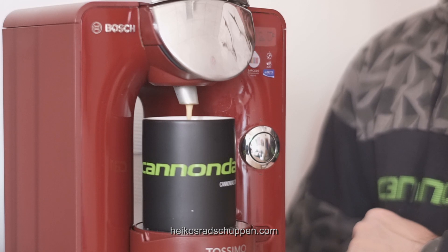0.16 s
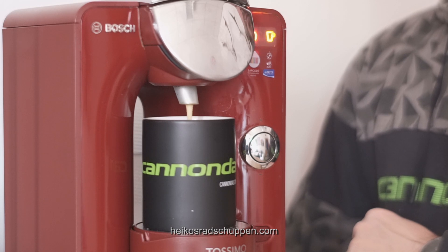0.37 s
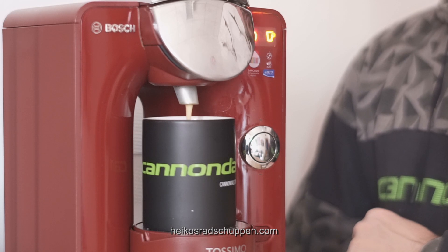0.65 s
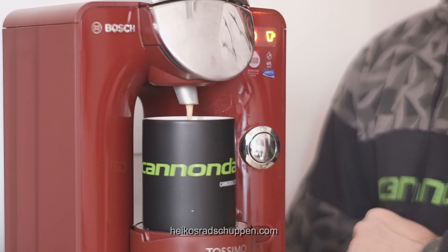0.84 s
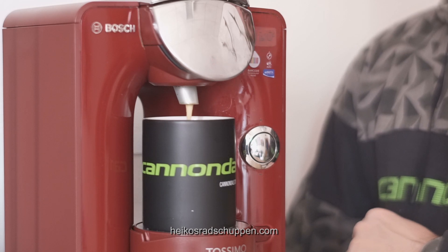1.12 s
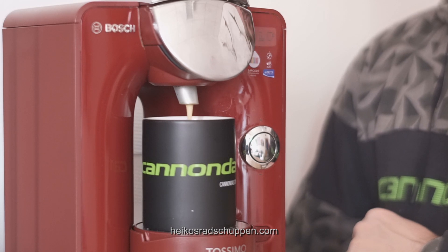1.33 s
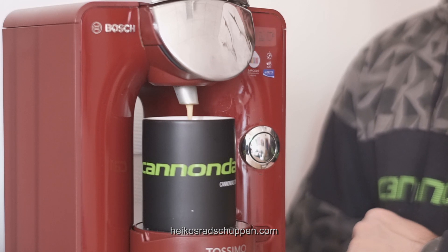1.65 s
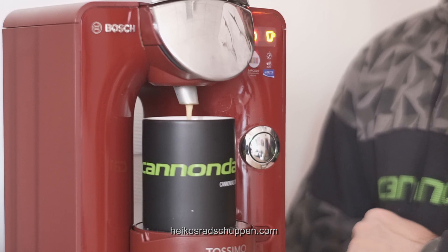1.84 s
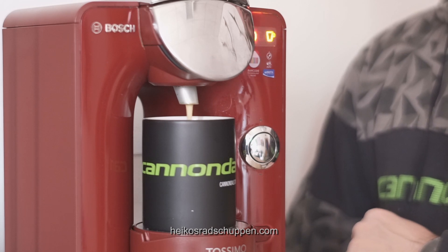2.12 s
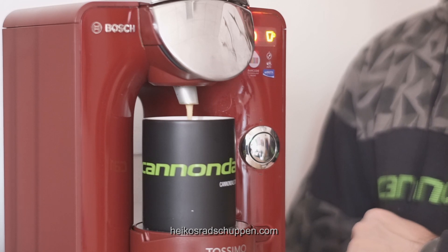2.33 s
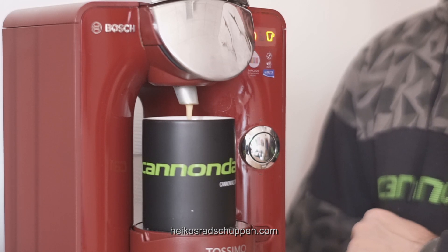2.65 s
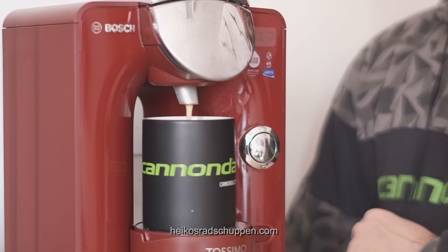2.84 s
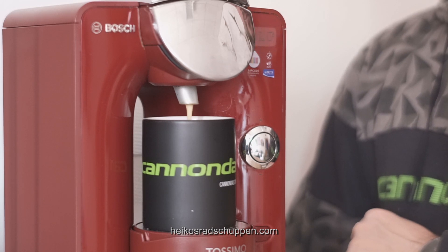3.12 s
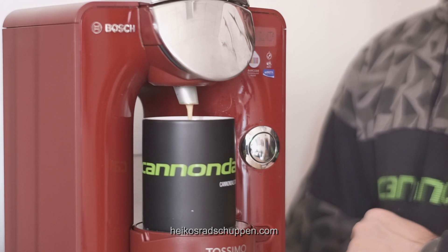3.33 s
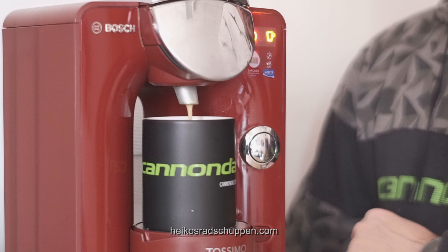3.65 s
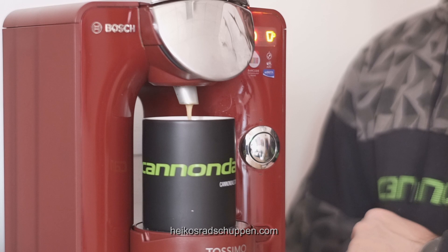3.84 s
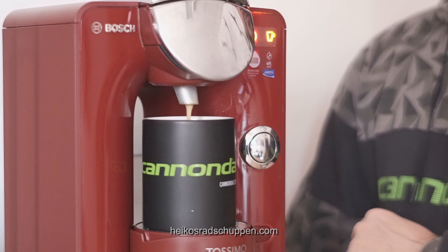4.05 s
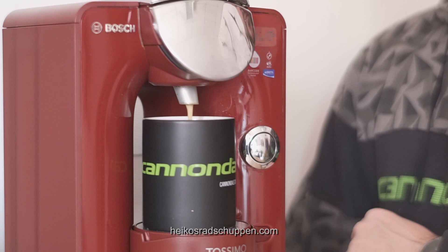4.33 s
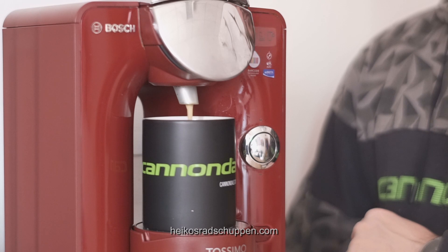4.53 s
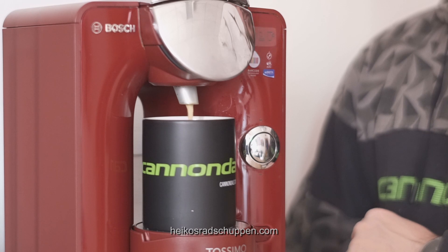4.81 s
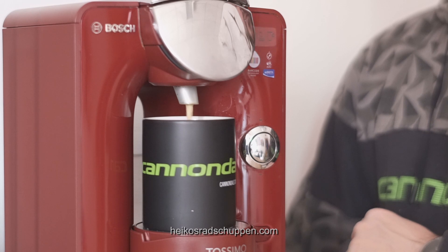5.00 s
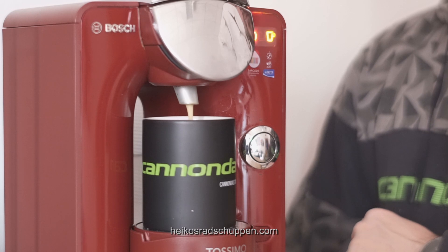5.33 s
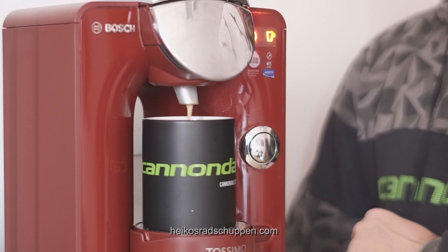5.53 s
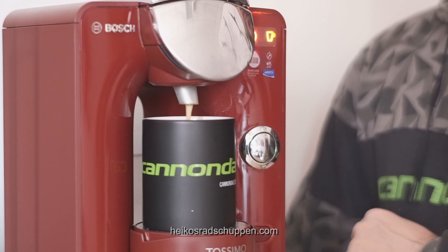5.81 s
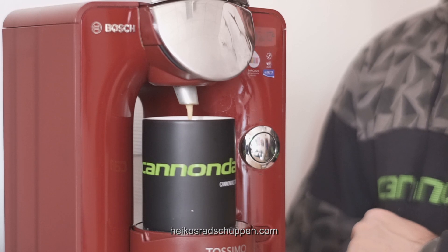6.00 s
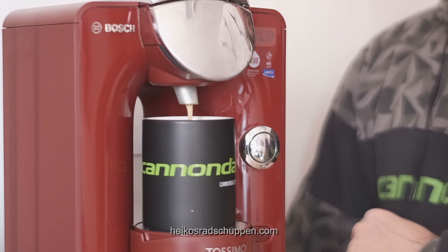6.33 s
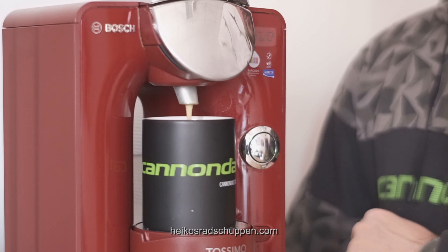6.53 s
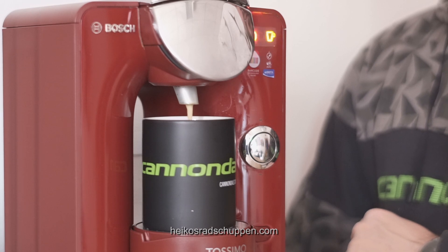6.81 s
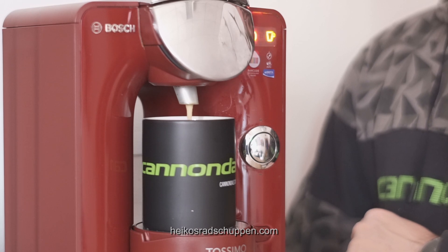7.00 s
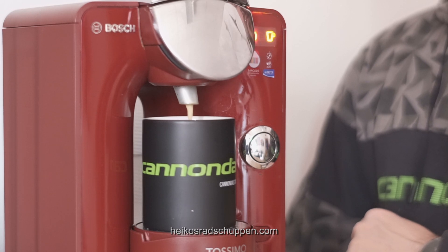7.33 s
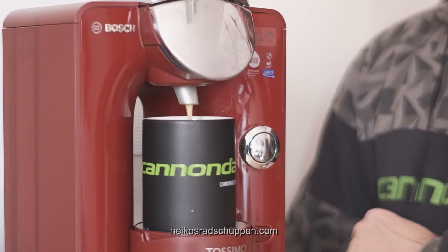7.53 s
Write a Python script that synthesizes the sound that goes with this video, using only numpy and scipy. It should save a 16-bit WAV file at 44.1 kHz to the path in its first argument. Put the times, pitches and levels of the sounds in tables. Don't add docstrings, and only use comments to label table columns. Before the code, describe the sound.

Close coffee maker: low electric pump hum and water rush cut off, wet glugging follows, then harsh bursts of hissing, spluttering steam.

```python
import sys
import numpy as np
from scipy import signal
from scipy.fft import rfft, irfft
from scipy.io import wavfile
from scipy.ndimage import uniform_filter1d

SR = 44100
rng = np.random.default_rng(int(sys.argv[2]) if len(sys.argv) > 2 else 0)


def pcm_store(signal):
    levels = np.round(np.clip(np.atleast_2d(signal), -1, 1) * 32767)
    wavfile.write(sys.argv[1], SR, levels.astype(np.int16).T)


def volts_from_decibels(level):
    exponent = np.asarray(level, float) / 20
    return 10 ** exponent


N = 337806
TIME = np.arange(N) / SR
HZ = np.fft.rfftfreq(N, 1 / SR)


def shape(points):
    hz, db = np.transpose(points)
    return volts_from_decibels(np.interp(np.log(HZ + 1), np.log(hz), db))


def level(x, db):
    return x * volts_from_decibels(db) / np.sqrt(np.mean(x ** 2))


# f/Hz, side minus mid level/dB
STEREO_WIDTH = [(30, -31), (60, -21), (200, -21), (400, -14.5), (800, -13), (1500, -11), (3000, -8),
                (6000, -6.5), (15000, -5.5)]


def noise(gain, wider_db=0):
    mid, side = rfft(rng.standard_normal((2, N))) * gain
    side = side * np.minimum(shape(STEREO_WIDTH) * volts_from_decibels(wider_db), 1)
    return level(irfft([mid + side, mid - side], N), 0)


def walk(rate):
    hold = int(SR / rate)
    steps = np.repeat(rng.standard_normal(N // hold + 1), hold)
    return 0.98 * uniform_filter1d(uniform_filter1d(steps, hold), hold)[:N]


def ring(x, modes, patchy_db=0):
    lumps_per_s = 35
    out = 0
    for k, (hz, width, db) in enumerate(modes):
        drive = x
        if patchy_db:
            drive = x * volts_from_decibels(patchy_db * walk(lumps_per_s) - .1 * patchy_db ** 2)
        out = out + (-1) ** k * volts_from_decibels(db) * signal.lfilter(*signal.iirpeak(hz, hz / width, SR), drive)
    return out


def bursts(times, db, t60, rise_s):
    out = np.zeros(N)
    for start, gain, fall in zip(times, volts_from_decibels(db), np.clip(t60, .005, .5)):
        part = slice(int(start * SR), int((start + fall) * SR))
        t = TIME[part] - start
        out[part] += gain * np.clip(t / rise_s, 0, 1) * volts_from_decibels(-60 * t / fall)
    return out


def spell(start, length, db, end_db, attack_s, release_s):
    t = TIME - start
    drift_db = db + (end_db - db) * np.clip(t / length, 0, 1)
    opening = np.minimum(t / attack_s, 1 + (length - t) / release_s)
    return volts_from_decibels(drift_db) * np.clip(opening, 0, 1)


# f/Hz, level/dB
ROOM_TONE = [(20, -39), (50, 1.5), (75, -7), (110, -5), (180, -9), (360, -13.5), (450, -13), (1000, -15),
             (2100, -17.5), (4700, -21.5), (7000, -26.5), (11000, -24.5), (15800, -26)]


def air():
    whistle = ring(noise(1), [(5750, 140, 0), (6290, 200, -8)])
    leak = level(whistle, -49.5) * volts_from_decibels(2.2 * walk(14))
    return level(noise(shape(ROOM_TONE), 4.0), -40.5) + leak


def room(x, wet_db, t60):
    t = TIME[:int(.5 * SR)]
    tail = noise(1)[:, :len(t)] * volts_from_decibels(-60 * t / t60) * (t > .004)
    tail = signal.lfilter([.5], [1, -.5], tail)
    tail = tail * volts_from_decibels(wet_db) / np.sqrt(np.sum(tail ** 2) / 2)
    return x + signal.fftconvolve(x, tail, axes=1)[:, :N]


# f/Hz, level/dB, t60/s
HOUSING = [(192, 3.5, 0.09), (244.4, 0.5, 0.22), (398, 3, 0.094), (534, 9.5, 0.046), (713, -1.5, 0.076),
           (1090, -2.5, 0.039), (1490, -5, 0.085), (2134, -9, 0.037)]


def knock():
    knock_s, knock_db = 7.082, -22
    blows = [(0, 4, -2), (.005, 4.5, -8), (.014, 0, 5), (.034, -3.5, -1), (.052, -8, 5)]  # s, dB, dB below 300 Hz
    out = np.zeros(N)
    t = TIME[:SR // 2]
    for delay, blow_db, low_db in blows:
        start = int((knock_s + delay) * SR)
        spots = rng.standard_normal((len(HOUSING), 2))
        for (hz, mode_db, t60), spot in zip(HOUSING, spots):
            swing = 1 - np.exp(-t * hz ** 2 / 200)
            db = knock_db + blow_db + mode_db + low_db * (hz < 300) + 2.1 * spot[0]
            tone = np.sin(2 * np.pi * hz * (1 + 0.028 * spot[1]) * t)
            out[start:start + len(t)] += volts_from_decibels(db - 60 * t / t60) * swing * tone
    crack = noise(HZ > 6000) * bursts([knock_s], np.array([-21]), [.05], 0.00071)
    return out + crack


# t/s, length/s, level/dB, f/Hz
WATER_POCKETS = [(3.177, .012, -40, 1340), (3.18, .01, -43, 1900), (3.219, .008, -39, 1320),
                 (3.218, .006, -41, 1850), (3.255, .007, -40, 1880), (3.257, .007, -42, 1340),
                 (3.294, .012, -40, 1360), (3.296, .008, -42, 1900), (3.4, .025, -40, 1300),
                 (3.485, .04, -41, 1000), (3.565, .008, -41, 1880), (3.296, .008, -42, 1900),
                 (3.4, .025, -40, 1300), (3.485, .04, -41, 1000), (3.565, .008, -41, 1880),
                 (3.893, .12, -46, 2120), (3.9, .025, -47, 4080), (3.893, .015, -44, 760),
                 (4.149, .035, -43, 550), (4.155, .015, -37, 1300), (4.224, .02, -42, 696),
                 (4.262, 0.046, -41, 510), (4.346, .02, -42, 660), (4.4, .04, -43, 830),
                 (4.483, .012, -36, 4050), (4.485, .014, -35, 1490), (4.533, .02, -37, 560),
                 (4.42, .01, -42, 6400), (4.438, .015, -41, 7600), (4.42, .01, -42, 6400),
                 (4.438, .015, -41, 7600), (4.615, .025, -44, 5750), (4.636, .012, -42, 7000),
                 (4.692, .012, -34, 2000), (4.636, .012, -42, 7000), (4.692, .012, -34, 2000),
                 (4.75, 0.018, -35, 2200), (4.275, .025, -42, 2100), (4.77, .03, -36, 700)]
# t/s, length/s, level/dB, f/Hz
STEAM_POCKETS = [(4.825, .02, -27, 1500), (4.895, .02, -26, 2050), (4.915, .02, -26, 1450),
                 (5.0, .03, -28, 2150), (5.05, .02, -26, 2150), (5.12, .08, -25, 555), (5.6, .05, -31, 850),
                 (5.79, .015, -27, 1500), (5.273, .016, -29, 2200), (5.281, .014, -32, 1500),
                 (5.333, 0.038, -24, 410), (5.34, .02, -29, 2150), (5.493, .012, -27, 2180),
                 (5.5, .014, -32, 1440), (5.572, .014, -33, 2200), (5.57, .012, -35, 4300),
                 (6.045, .015, -27, 1480), (6.093, .016, -22, 1500), (6.24, 0.045, -28, 406),
                 (6.3, .016, -29, 1620), (6.603, 0.072, -28, 820), (6.7, .018, -32, 1720),
                 (6.715, .035, -26, 810), (7.24, .02, -36, 1510), (7.41, 0.055, -31.5, 1530)]


def pockets():
    attack_s, release_s = .002, .012
    out, flow = np.zeros((2, N)), noise(1)
    for start, length, db, hz in WATER_POCKETS + STEAM_POCKETS:
        part = slice(int((start - .03) * SR), int((start + length + 0.057) * SR))
        tone = level(ring(flow[:, part], [(hz, hz * 0.028 + 15, 0)]), 0)
        tone = tone / np.abs(signal.hilbert(tone)) ** .7
        out[:, part] += tone * spell(start, length, db, db - 2, attack_s, release_s)[part]
    return out


# t/s, pressure level/dB, wetness/dB
SEEP = [
    (3.05, -49, 6.5),
    (3.7, -54.5, 5.5),
    (4.3, -41.5, -0.5),
    (4.75, -38, -3),
    (5.45, -29, 1),
    (6.5, -33.5, -3.5),
    (6.9, -30.5, -9),
    (7.38, -36, -10),
    (7.66, -33, -13.5),
]
# t/s, length/s, pressure level/dB at the start, at the end, wetness/dB
GUSTS = [(3.565, 0.043, -49, -55, 0), (3.36, 0.064, -47, -47, 4), (3.482, .07, -52, -57, 10),
         (3.887, 0.1, -42, -58, -3), (4.13, 0.18, -55, -42.5, 3.5), (4.475, 0.056, -47, -53, 1),
         (4.753, 0.054, -38, -38, 6), (4.81, 0.059, -24, -30, 1.5), (4.878, 0.066, -16, -22, -1.5),
         (4.979, 0.2, -16.5, -23, 0.5), (5.211, 0.14, -24.5, -28, 2.5), (5.457, 0.043, -30, -38, -4),
         (5.554, 0.336, -39.5, -27.5, -2.5), (5.9, 0.13, -22.5, -24.5, -0.5), (6.033, .4, -23.5, -32, 0),
         (6.547, .28, -27, -30, 2), (6.903, 0.21, -34.5, -41, 5.5), (7.09, 0.23, -36.5, -42, 10),
         (7.385, 0.11, -35, -40.5, -5)]


def flow_db():
    attack_s, release_s = 0.023, 0.053
    s, db, wet_db = np.transpose(SEEP)
    total = volts_from_decibels(np.interp(TIME, s, db, left=-90))
    wet = total * np.interp(TIME, s, wet_db)
    for start, length, db, end_db, wet_db in GUSTS:
        gust = spell(start, length, db, end_db, attack_s, release_s)
        total = total + gust
        wet = wet + gust * wet_db
    return 20 * np.log10(total), wet / total


# t/s, peak level/dB, f/Hz, t60/s
BUBBLES = [(3.403, -28, 833.4, 0.017), (3.381, -29, 750, .02), (3.382, -31, 1900, .012),
           (3.438, -31, 1900, .012), (3.444, -30, 800, .015), (3.506, -31, 1150, .015),
           (3.543, -33, 850, .015), (3.605, -33, 1500, .015), (3.406, -23, 1250, 0.008),
           (3.4103, -16, 850, 0.013), (3.423, -19, 785, 0.021), (3.48, -28, 966, 0.023),
           (3.492, -23, 990, 0.0218), (3.521, -25, 676, 0.025), (3.567, -33, 1360, 0.025),
           (3.593, -21.5, 1591, 0.011), (3.5925, -27, 900, .01), (3.5925, -27, 900, .01),
           (3.651, -34, 1290, 0.039), (3.896, -37, 2120, 0.022), (3.9434, -16, 420, 0.01),
           (3.9448, -23, 1930, 0.0097), (4.032, -27, 2500, 0.025), (4.055, -21, 1680, 0.007),
           (4.26, -29, 2000, 0.025), (4.485, -25, 2160, 0.0281), (4.638, -25, 2040, 0.0169),
           (4.694, -20, 2000, 0.041), (4.716, -29, 1780, 0.0211), (4.744, -28, 2140, 0.05)]


def pops():
    out = np.zeros(N)
    t = TIME[:int(.06 * SR)]
    click = np.exp(-t / 0.00014) - 0.17 * np.exp(-t / 0.0009)
    froth_count = 110
    when = rng.uniform(3.12, 4.7, size=froth_count)
    size, pitch = rng.standard_normal((froth_count, 2)).T
    froth_db = flow_db()[0][(when * SR).astype(int)] + 3.5 + 2.5 * size
    froth_hz = 1210 * 2 ** (.45 * pitch)
    froth = zip(when, froth_db, froth_hz, np.full(froth_count, .014))
    for start, db, hz, t60 in [*BUBBLES, *froth]:
        fall = volts_from_decibels(-60 * t / np.clip(t60, .004, .06))
        tone = np.sin(2 * np.pi * hz * t * (1 + 1.8 * t))
        tone = tone + 0.3 * fall * np.sin(2 * np.pi * 2.33 * hz * t)
        first = int(start * SR)
        out[first:first + len(t)] += volts_from_decibels(db) * (0.81 * fall * tone + 0.61 * click)
    return signal.lfilter([.6], [1, -.4], out)


# t/s, level/dB, wetness/dB, t60/s
SPLUTTERS = [
    (4.1535, -27, 4, 0.06),
    (4.2602, -26.5, 1, 0.075),
    (4.4194, -30, -5, 0.048),
    (4.4378, -29, -16, 0.048),
    (4.485, -20, -13, 0.049),
    (4.5714, -33, -7, 0.049),
    (4.6389, -26.5, -5, 0.051),
    (4.6945, -24, -3, 0.051),
    (4.7414, -24, -11, 0.06),
    (4.751, -18.5, 2, 0.11),
]
# t/s, level/dB, wetness/dB, t60/s
SPITS = [(4.811, -18, 7.5, 0.19), (4.881, -10, 2, 0.1), (4.8955, -12, -4, .04), (4.9846, -14, 14, 0.097),
         (5.0513, -7, 4, 0.13), (5.167, -19, 23.5, 0.085), (5.2804, -11.5, 3, 0.15),
         (5.3415, -12, -1, 0.12), (5.4975, -8, 2.5, 0.056), (5.5733, -17.5, -8, 0.077),
         (5.711, -13, 2, 0.038), (5.79, -10.5, 3, 0.089), (5.832, -8.5, 3, 0.11), (5.9387, -9.5, 9.5, 0.12),
         (5.99, -9, -1, 0.064), (6.0474, -7, 3, 0.088), (6.096, -7.5, 3, 0.06), (6.1784, -12.5, -3, 0.064),
         (6.2417, -9.5, 6, 0.091), (6.301, -13, 5, 0.17), (6.569, -19, -11, 0.052),
         (6.643, -14, 12.5, 0.08), (6.7096, -9, 5, 0.073), (6.7964, -22, -7, 0.04),
         (6.8314, -18, -14, 0.054), (6.9087, -23, -16, 0.08), (6.9444, -21, -20, 0.048),
         (7.0825, -6.5, 8, 0.059), (7.2434, -20, 2, 0.11), (7.407, -18.5, -6, 0.13),
         (7.4344, -15.5, 0, 0.093)]
# f/Hz, level/dB
JET = [(140, -28), (215, -12.5), (430, -3.5), (490, -60), (560, -12.5), (900, -12), (1040, -21),
       (1500, -13), (1900, -18.5), (3000, -18), (8200, -19), (8800, -24.5), (11500, -25.5), (15800, -36)]
# f/Hz, width/Hz, level/dB
FLOODED = [(365, 540, -9), (573, 15, 2.5), (660, 330, -2.5), (1290, 102.8, -5), (1860, 68, 5),
           (2120, 440, 3), (4600, 1700, 0)]
# f/Hz, width/Hz, level/dB
BODY = [(240, 9.7, 1), (323, 29, -23), (413.7, 4.9, 1.5), (568, 13.2, 5), (656, 16, -1.5),
        (747.5, 16.4, -1), (816.7, 18.7, 1.5), (847.6, 10.6, 4), (932, 30, -11.5), (1360, 7.2, -5),
        (1480, 44, 0.5), (1639, 33, -9.5), (2007, 147, -7), (2235, 32, -9), (2520, 28, -8)]
# f/Hz, width/Hz, level/dB
SPOUT = [(2802.8, 36, -1.5), (2980, 36, 0), (3605, 77, -0.5), (3960, 100, -5), (4330, 190, -1.5),
         (4890, 49, 2), (5300, 73, 0.5), (6050, 160, -1.5), (6830, 330, -11), (7530, 160, -4),
         (8010, 180, -9.5), (10720, 90, -9), (11380, 240, -11.5), (12800, 200, -17)]
EDGES_HZ = [620, 1150, 2800]
# level/dB, share of wetness
RANGES = [(-3, 1.27, 1.01, -16, 1), (-2.5, 0.91, 1.17, -11, 0.88), (-3, 0.00045, 1.26, -1.5, 0.084),
          (-4.5, -0.34, 0.97, -5.5, -.5)]
PATCHY_DB = [1.5, 1.5, 2.5, 3.5]


def steam():
    clear_s, pressure_ref_db = 4.76, -28
    pressure_db, wet_db = flow_db()
    glugs = [(3.1415 + k * .0388, -35, 2, 0.068) for k in range(7)]
    when, spit_db, spit_wet_db, t60 = np.transpose(glugs + SPLUTTERS + SPITS)
    out, gust = 0, walk(30)
    drops = (rng.random(N) < 45 / SR) * rng.exponential(0.68, N) * (TIME > clear_s)
    crackle = 0.75 + signal.lfilter([1], [1, -np.exp(-1 / (0.0027 * SR))], drops)
    edges = [0] + EDGES_HZ + [SR]
    dull = 1.04 / np.sqrt(1 + (HZ / 11000) ** 2)
    ringing_share = [0.68, 0.85, 0.62, 0.16]
    for k, (above_db, wet, slope, spit_above_db, spit_wet) in enumerate(RANGES):
        inside = shape(JET) / (1 + (edges[k] / (HZ + 1)) ** 12) / (1 + (HZ / edges[k + 1]) ** 12)
        range_db = pressure_ref_db + slope * (pressure_db - pressure_ref_db) + above_db + wet * wet_db
        flow = volts_from_decibels(range_db + 1.37 * gust + 1.07 * walk(60))
        spit = bursts(when, spit_db + spit_above_db + spit_wet * spit_wet_db - 5.0, t60, 0.0016)
        jet = noise(1)
        wet_spits = irfft(rfft(jet[:, ::-1] * spit) * dull, N)
        push = jet * flow * crackle + wet_spits
        share = ringing_share[k]
        hiss = irfft(rfft(push) * inside, N) / np.std(irfft(rfft(jet) * inside, N))
        out = out + np.sqrt(1 - share) * hiss
        for pipe, active in [(FLOODED, TIME < clear_s), (BODY + SPOUT, TIME >= clear_s)]:
            modes = [m for m in pipe if edges[k] <= m[0] < edges[k + 1]]
            patchy_db = PATCHY_DB[k] * (pipe is not FLOODED)
            rung = ring(push * active, modes, patchy_db) / np.std(ring(jet[0, :SR], modes))
            out = out + np.sqrt(share) * rung
    return out


STOP_S = 2.97
AFTER = np.maximum(TIME - STOP_S, 0)
STROKES = 50 * (TIME - .0156)
FADE_DB = np.maximum(-AFTER * 700, -5 - AFTER * 230)
GATE = np.exp(-((STROKES - .76) % 1) / .13)

# f/Hz, level/dB
SPRAY = [(3000, -26), (6000, 4.5), (8000, 5), (11500, 1), (15800, -26)]
# t/s, peak level/dB
TICKS = [
    (0.0385, -25.5),
    (0.0767, -25.5),
    (0.178, -26.5),
    (0.1974, -28),
    (0.2399, -29),
    (0.3481, -35),
    (0.4968, -31),
    (0.9393, -31.5),
    (1.9584, -29),
    (2.7182, -31.5),
]


def spray():
    mist = noise(shape(SPRAY)) * (1 + 0.4 * GATE) * volts_from_decibels(-48.5 - 3.0 * TIME + FADE_DB)
    s, db = np.transpose(TICKS)
    ticks = noise(shape(SPRAY)) * bursts(s, db - 3.5, np.full(len(s), 0.044), 0.00068)
    return mist + ticks


# f/Hz, width/Hz, level/dB
VALVE = [(2480, 60, -6), (3100, 150, -6), (3420, 110, 1), (3890, 90, 2), (5720, 400, -10)]
# t/s, length/s, level/dB
CHATTER = [(0.042, 0.18, -42), (0.223, .26, -37.5), (.505, 0.11, -36), (0.643, 0.14, -34.5),
           (0.915, .03, -34), (1.003, 0.29, -43), (1.422, 0.15, -39), (1.739, 0.085, -37),
           (1.86, 0.11, -45), (2.067, 0.38, -42), (2.503, 0.12, -41), (2.625, 0.12, -37.5)]


def valve_chatter():
    force = volts_from_decibels(1.5 * rng.standard_normal(400))[(STROKES + 1.24).astype(int)]
    slap = np.diff(np.floor(STROKES - .76 + .006 * walk(70)), prepend=0) > 0
    valve = level(ring((2.5 * slap + noise(1) * GATE) * force, VALVE), 0)
    loudness = volts_from_decibels(-46.5)
    for start, length, db in CHATTER:
        loudness = loudness + spell(start, length, db - 4, db - 8, 0.02, 0.02)
    return valve * volts_from_decibels(FADE_DB) * loudness


# f/Hz, level/dB
RUSH = [(40, -9), (150, -7), (420, 2.5), (700, 0.5), (1100, -2), (1600, 0), (2200, -1.5), (2600, -6),
        (2850, -11.5), (3300, -9.5), (3700, -12.5), (4500, -12.5), (6500, -20.5), (9000, -25)]


def water_rush():
    rush_db = -29 - 0.56 * TIME + .4 * walk(4.2) + .8 * walk(24.59)
    rush = noise(shape(RUSH)) * volts_from_decibels(rush_db + FADE_DB)
    return rush * (1 + 0.3 * np.cos(2 * np.pi * (STROKES - .1)))


# multiple of the stroke rate, level/dB
BUZZ = [(1, -23), (2, -17), (3, -25.5), (4, 0.5), (5, -3.5), (6, -38), (7, -10), (8, -11.5), (9, -4),
        (10, -19.5), (11, -27), (12, -11.5), (13, -19), (14, -25), (15, -32), (16, -16.5), (17, -30),
        (18, -13), (19, -18), (20, -16.5), (21, -30), (22, -26.5), (23, -31), (24, -22), (25, -19.5),
        (26, -22.5), (27, -15), (28, -29), (29, -58), (30, -15), (31, -21)]
# multiple of the stroke rate, level/dB
BUZZ_DRY = [(1, -19), (2, -17), (3, -25.5), (4, 1.5), (5, -4.5), (6, -33), (7, -11), (8, -13), (9, -7),
            (10, -27), (11, -23), (12, -10), (13, -12.5), (14, -11), (15, -24), (16, -16), (17, -29),
            (18, -26), (19, -16), (20, -17), (21, -39.5), (22, -40), (23, -12), (24, -21), (25, -31),
            (26, -18.5), (27, -20), (28, -33), (29, -17.5), (30, -19.5), (31, -29)]
# multiple of the stroke rate, level/dB at first, level/dB as the capsule runs dry
RATTLE = [(31.8, -30, -33), (33.05, -20, -25), (34, -25, -33), (36.9, -29, -29), (37.97, -20, -23),
          (39, -33, -27), (39.7, -28, -29), (40.8, -30, -32), (41.8, -26, -33), (42.9, -20.5, -14.5),
          (45, -28, -32), (45.6, -30, -31), (49.2, -27, -22), (49.9, -26.5, -28), (53.1, -31, -27),
          (67.9, -31, -33), (69, -31, -33), (78, -26, -29)]


def piston_buzz():
    dryness = np.clip((TIME - 1.7) / 1.15, 0, 1)
    buzz, on = np.zeros((2, N)), TIME < STOP_S + .6
    partials = [early + late[1:] for early, late in zip(BUZZ, BUZZ_DRY)] + RATTLE
    for k, db, dry_db in partials:
        loose = np.sqrt(k)
        lag, start = rng.standard_normal(2)
        phase = (2 * np.pi * (k * STROKES - k % 2 / 4) + .05 * loose * walk(9))[on]
        phase = phase + .002 * k ** 2 * start
        phase = phase + np.array([[1], [-1]]) * (.014 * loose * lag)
        partial_db = db + dryness * (dry_db - db) + 0.32 * loose * walk(5.76)
        partial_db = partial_db - AFTER * (105 + 12 * k + .2 * k ** 2)
        buzz[:, on] -= volts_from_decibels(partial_db[on]) * np.cos(phase)
    return volts_from_decibels(-22.5) * buzz


def pump():
    return piston_buzz() + water_rush() + valve_chatter() + spray()


def scene():
    machine = steam() + knock() + pops() + pockets()
    return pump() + room(machine, -18, .45) + air()


def low_pass(x):
    return signal.sosfilt(signal.butter(12, 15900, fs=SR, output="sos"), x)


# f/Hz, left minus right level/dB
LEFT_DB = [(60, 0), (300, .5), (1000, .5), (2500, .2), (5000, 1.7), (15000, 1.5)]


def record(dry):
    top_hz, lead_s = 15830, 1.3 / SR
    tilt = np.sqrt(shape(LEFT_DB))
    early = np.exp(2j * np.pi * HZ * lead_s / (1 + (HZ / 6000) ** 2))
    soft = .9 * np.tanh(dry / .9)
    mix = irfft(rfft(soft) * [tilt * early, 1 / tilt] * (HZ < top_hz), N)
    return low_pass(mix)


dry = scene()
out = record(dry)
pcm_store(out)
```